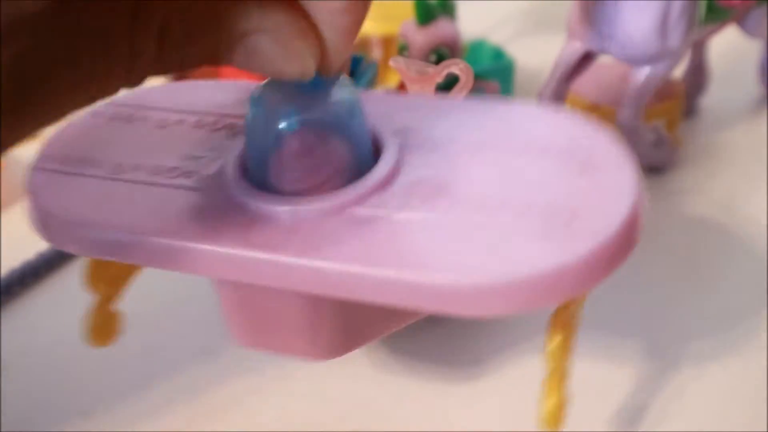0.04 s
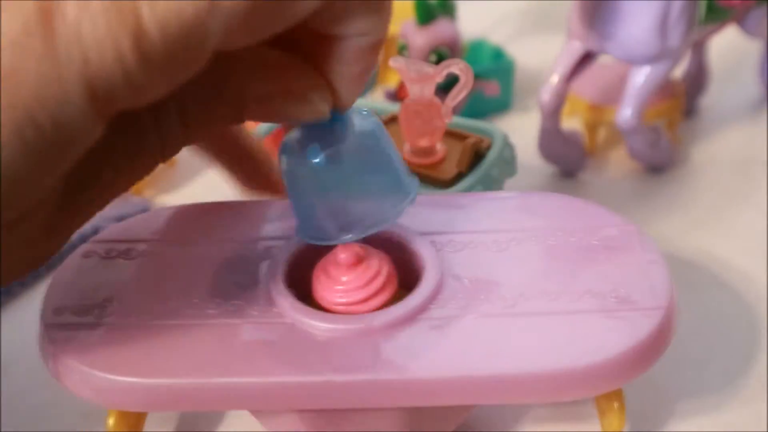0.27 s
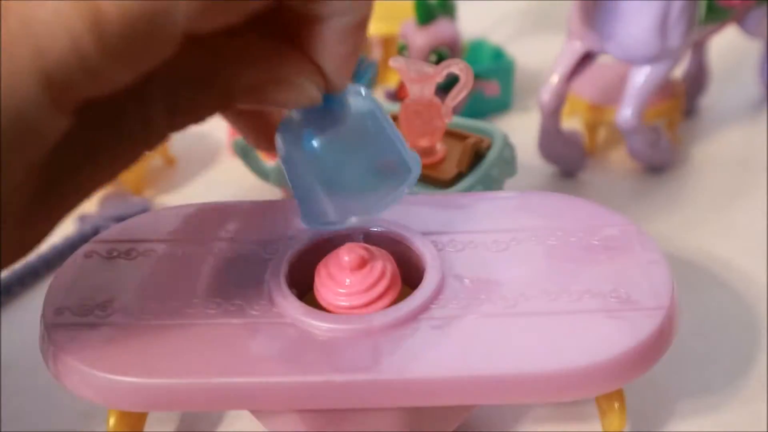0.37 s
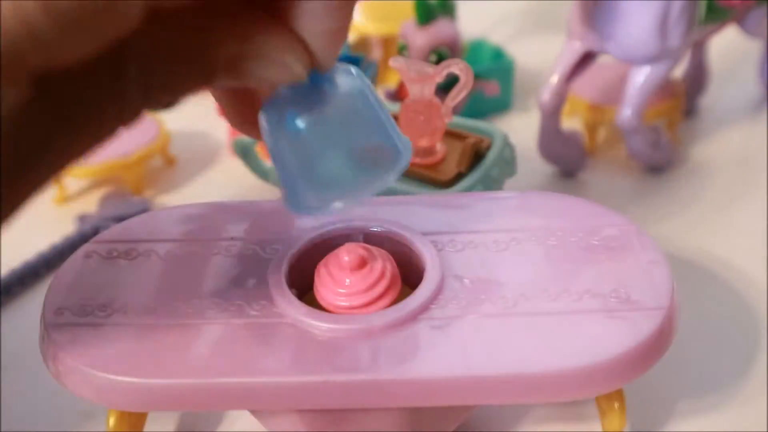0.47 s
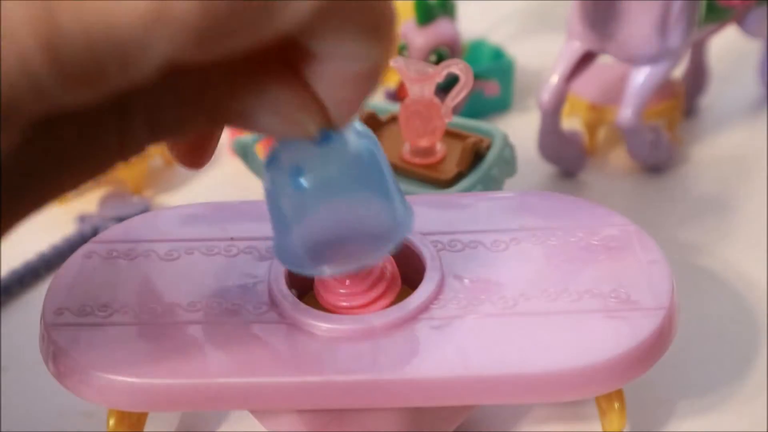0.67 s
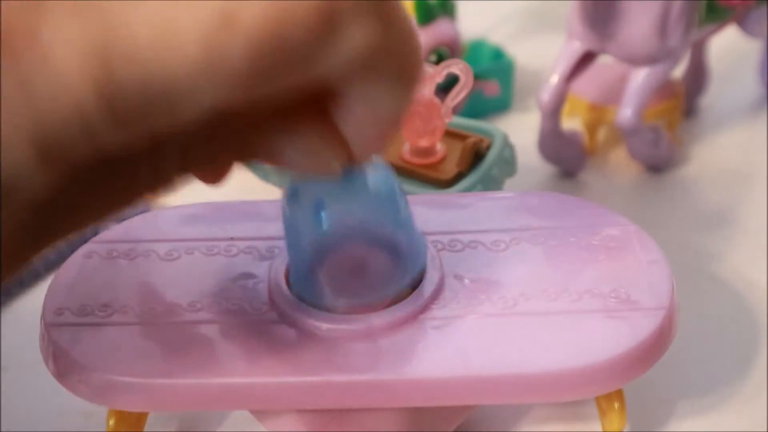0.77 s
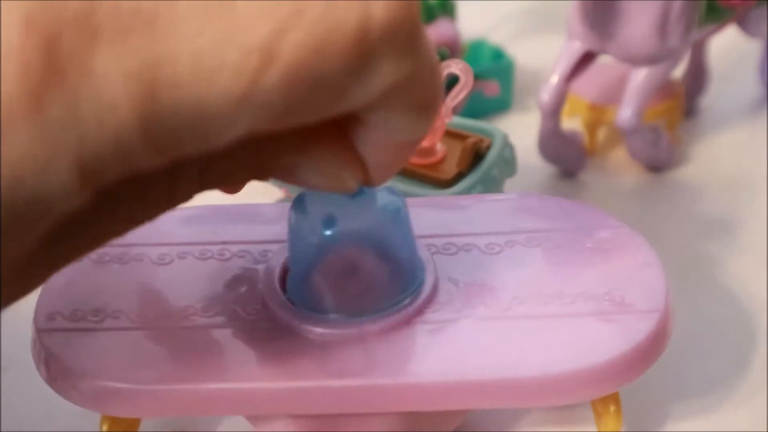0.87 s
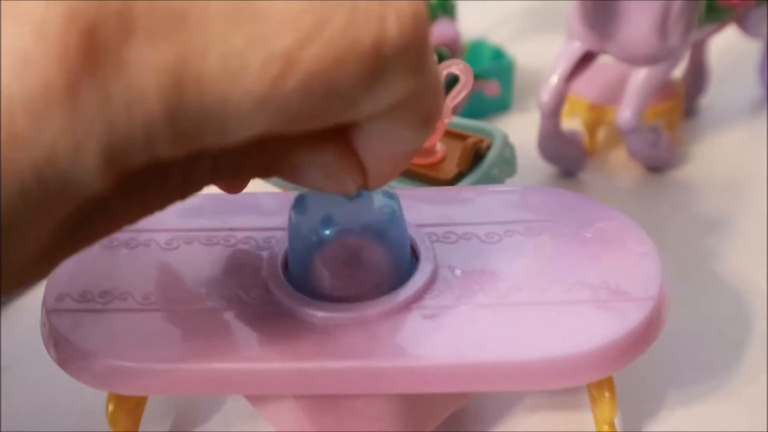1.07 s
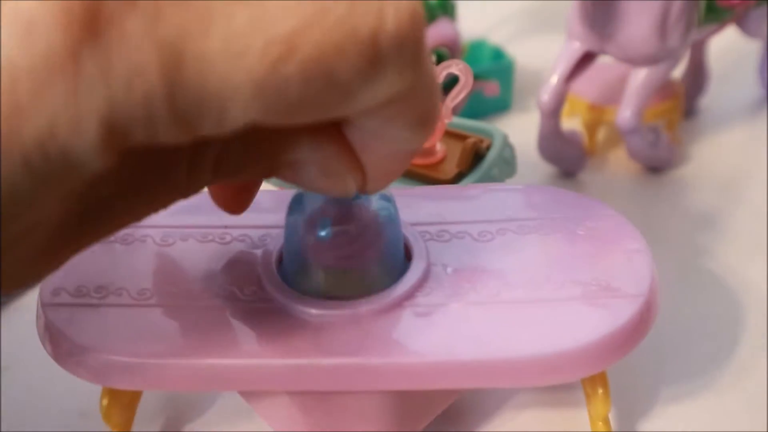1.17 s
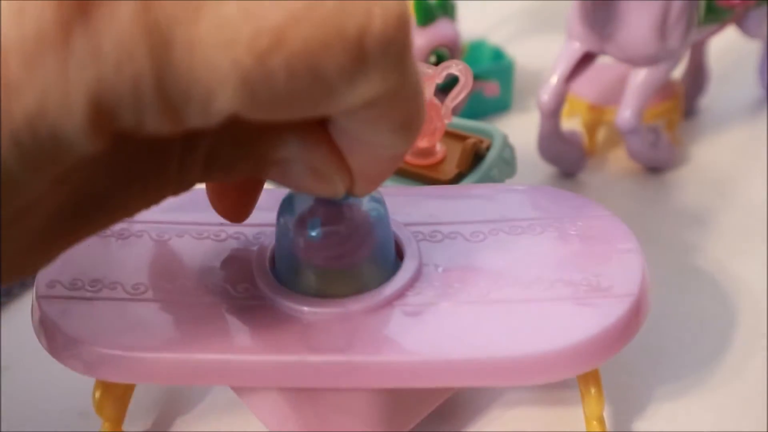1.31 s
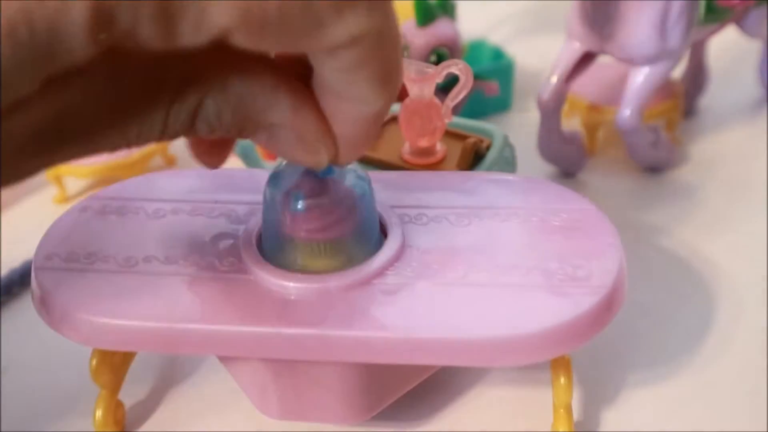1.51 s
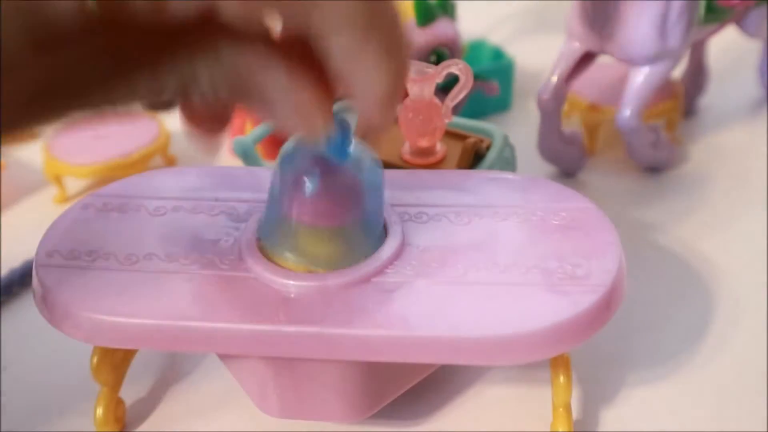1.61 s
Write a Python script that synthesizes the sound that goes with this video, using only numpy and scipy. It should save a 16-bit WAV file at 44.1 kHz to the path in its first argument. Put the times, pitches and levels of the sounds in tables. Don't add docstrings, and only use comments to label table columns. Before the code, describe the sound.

Close-up plastic toy handling: a bright burst of snaps first, a short pause, then light knocks and small clicks as the lid is seated, with faint finger rubbing, soft desk thumps and low room tone.

```python
import sys
import numpy as np
from scipy import signal
from scipy.io import wavfile

SR = 44100
rng = np.random.default_rng(int(sys.argv[2]) if len(sys.argv) > 2 else 0)


def level_to_linear(level):
    exponent = np.asarray(level, float) / 20
    return 10 ** exponent


def transcribe(u):
    v = np.clip(np.atleast_2d(u).T, -1, 1)
    q = np.round(v * 32767).astype(np.int16)
    wavfile.write(sys.argv[1], SR, q)


N = 72765
TOY_CUT_HZ = 220


def rms_one(x):
    return x / np.sqrt(np.mean(x ** 2) + 1e-20)


def at_hz(points, hz):
    pitches, values = np.transpose(points)
    return np.interp(np.log(hz), np.log(pitches), values)


def ring(clicks, hz, t60):
    shrink = level_to_linear(-60 / (max(t60, .003) * SR))
    turn = 2 * np.pi * hz / SR
    return signal.lfilter([0, np.sin(turn)], [1, -2 * shrink * np.cos(turn), shrink ** 2], clicks + 1e-18)


def cut(x, hz, kind, order=2):
    return signal.sosfilt(signal.butter(order, hz, kind, fs=SR, output="sos"), x)


def drift(rate):
    r = np.exp(-2 * np.pi * rate / SR)
    wander = signal.lfilter([1], [1, -2 * r, r * r], rng.standard_normal(2 * N))
    return rms_one(wander[N:])


def banded_noise(spectrum, likeness, patchy_db, rate):
    out = 0
    borders = 22 * 2 ** np.arange(0, 9.6, .5)
    white = rng.standard_normal((2, 2, N))
    for k, (low, high) in enumerate(zip(borders, borders[1:])):
        mid, side = cut(white[k % 2], [low, high], "band")
        hz = np.sqrt(low * high)
        alike = np.clip(at_hz(likeness, hz), -1, 1)
        stereo = np.sqrt(1 + alike) * mid + np.sqrt(1 - alike) * side * [[1], [-1]]
        out = out + level_to_linear(at_hz(spectrum, hz) + patchy_db * drift(rate)) * stereo
    return rms_one(out)


def struck(rows, modes):
    clicks = np.zeros(N)
    for s, db in rows:
        clicks[int(s * SR)] = level_to_linear(db)
    return sum(level_to_linear(db) * ring(clicks, hz, t60) for hz, db, t60 in modes)


def echo(x, t60, channels):
    t = np.arange(SR // 2) / SR
    tail = rng.standard_normal((channels, len(t))) * level_to_linear(-60 * t / t60)
    tail /= np.sqrt(np.sum(tail ** 2, axis=1, keepdims=True))
    return signal.fftconvolve(x[None], tail, axes=1)[:, :N]


def room_air():
    # (pitch [Hz], level [dB per Hz])
    air_colour = [(15, -32), (25, 0), (149, 0.5), (335, -10.5), (936, -7.5), (1020, -14.5), (2480, -16),
                  (9070, -34.5), (16000, -54)]
    # (pitch [Hz], likeness [-1 to 1])
    air_likeness = [(60, 1), (200, 0.95), (700, -0.77), (4000, 0.46), (15000, -.6)]
    return level_to_linear(-65) * banded_noise(air_colour, air_likeness, patchy_db=2.0, rate=5.8)


def whine():
    # (pitch [Hz], level [dB rms])
    tones = [(2536, -91), (2713, -87), (2918, -97), (3343, -91)]
    width_hz = 12
    return sum(level_to_linear(db) * rms_one(ring(rng.standard_normal(N), hz, 2.2 / width_hz)) for hz, db in tones)


def clock():
    # (time [s], peak level [dB])
    ticks = [(0.0538, -54), (0.0942, -50), (0.5294, -61.5), (0.5644, -61), (0.6943, -61.5), (0.7267, -55),
             (0.8315, -56), (0.8644, -61), (0.9951, -72.5), (1.2156, -57.5), (1.4282, -51.5)]
    hz = 2479
    return cut(struck(ticks, [(hz, 1.5, 0.015)]), [0.87 * hz, 1.25 * hz], "band")


def desk_hum():
    # (time [s], peak level [dB])
    pushes = [(.002, -58.5), (.19, -65), (.235, -37.5), (.295, -50.5), (.43, -53), (.885, -47.5),
              (.93, -49), (1.03, -49), (1.07, -53), (1.185, -56), (1.268, -41.5), (1.36, -51), (1.465, -43),
              (1.55, -47), (1.61, -51.5)]
    # (pitch [Hz], level [dB], ring time t60 [s])
    desk_modes = [(147.6, 1.5, 0.35), (173.5, -1, 0.16), (114, -4.5, 0.36), (213.5, 2, 0.24),
                  (285, -5.5, 0.057), (341.4, -16, .06)]
    push_s, push_hz = 0.015, 152
    t = np.arange(int(push_s * SR)) / SR
    push = np.sin(np.pi * t / push_s) * np.cos(2 * np.pi * push_hz * t)
    hum = np.convolve(struck(pushes, desk_modes), push / np.abs(push).sum())[:N]
    return level_to_linear(2.5) * cut(hum, 110.7, "high", order=4)


def palm_bumps():
    # (time [s], peak level [dB])
    bumps = [
        (.224, -47),
        (.305, -51),
        (1.07, -51),
        (1.192, -42.5),
        (1.47, -71),
    ]
    hz, t60_s = 62, .08
    return cut(struck(bumps, [(hz, 0, t60_s)]), 2 * hz, "low")


def rubbing():
    # (time [s], level [dB])
    pressure = [(0, -60.5), (.1, -62), (.17, -63), (0.377, -60.5), (0.461, -69), (.6, -80.5),
                (0.862, -75.5), (0.949, -59.5), (1.0, -63.5), (1.04, -61.5), (1.14, -64.5), (1.23, -59),
                (1.256, -52.5), (1.338, -53.5), (1.422, -62), (1.5, -57.5), (1.589, -57), (1.65, -58)]
    # (pitch [Hz], level [dB per Hz])
    rub_colour = [(180, -27), (300, 1), (444, -8), (1060, -3.5), (1520, -8), (2520, -9), (6510, -25),
                  (15000, -43)]
    # (pitch [Hz], likeness [-1 to 1])
    rub_likeness = [(300, 0.061), (2000, 0.48), (6000, 0.32), (15000, -.4)]
    loudness = level_to_linear(np.interp(np.arange(N) / SR, *np.transpose(pressure)))
    return loudness * banded_noise(rub_colour, rub_likeness, patchy_db=4.5, rate=34)


def squeaks():
    # (time [s], peak level [dB], first pitch [Hz], last pitch [Hz], length [s])
    chirps = [
        (0.39, -22, 2700, 2910, 0.0035),
        (.3912, -22, 3460, 4410, 0.0031),
        (1.6175, -42.5, 3240, 3620, 0.0041),
        (1.196, -33.5, 429, 565, .011),
    ]
    out = np.zeros(N)
    for s, db, from_hz, to_hz, length in chirps:
        share = np.arange(int(length * SR)) / (length * SR)
        turns = np.cumsum(from_hz + (to_hz - from_hz) * share) / SR
        swell = np.sin(np.pi * share ** 1.7)
        start = int(s * SR)
        out[start:start + len(share)] += level_to_linear(db) * swell * np.sin(2 * np.pi * turns)
    return out


def snaps():
    # (time [s], peak level [dB], pitch [Hz], ring time t60 [s])
    snap_rows = [(.2262, -11.5, 1535, 0.0083), (.2317, -7, 1608, 0.017), (.2318, -7.5, 2640, 0.02),
                 (.2385, -19, 2550, .008), (.2413, -19, 2810, 0.0029), (.2455, -23, 2720, .01),
                 (.2488, -19, 3200, .006), (.2536, -12.5, 3500, .005), (.2875, -20.5, 3900, 0.0044),
                 (.2916, -22, 2100, .006), (.3965, -21.5, 4800, 0.0027), (1.262, -24, 1120, .01),
                 (1.2695, -27.5, 1180, 0.017), (1.5538, -28, 3600, 0.0055), (1.5628, -26, 3600, 0.0047),
                 (1.5698, -30, 5640, 0.0034), (1.5705, -34, 3520, 0.0055), (1.577, -29, 3450, 0.0054),
                 (1.5205, -51, 800, .02), (1.5268, -42.5, 800, 0.045), (.2327, -29, 1880, 0.015),
                 (.2848, -22, 3670, 0.003), (.3, -22.5, 1960, .008), (1.2625, -19, 2380, .006),
                 (1.2695, -36, 2400, 0.0048), (1.279, -34, 2200, 0.0055), (1.2368, -44.5, 3000, 0.0054),
                 (1.532, -43, 725, .02), (0.3937, -31, 1750, 0.011), (.403, -35, 1800, 0.012),
                 (.9162, -29, 1920, 0.0081), (0.9224, -27.5, 1850, 0.011), (1.0553, -29, 2044, 0.019),
                 (1.197, -39, 1060, .018), (1.6192, -31, 3500, 0.0036), (1.4576, -38, 947, 0.026),
                 (1.459, -42, 2970, 0.0074), (.228, -23.5, 630, .05), (1.2605, -30, 4820, .003),
                 (0.204, -32, 1230, 0.018)]
    out = np.zeros(N)
    for s, db, hz, t60 in snap_rows:
        out += cut(struck([(s, db)], [(hz, 0, t60)]), [hz / 2.3, min(2 * hz, SR / 3)], "band")
    return out


def contacts(rows, strike=1, rise=1e-5):
    # (pitch [Hz], level [dB], ring time t60 [s])
    shell = [(552, -12.5, 0.1), (652, -17, 0.034), (800, -6, 0.01), (950, -5, 0.011), (1200, -3, 0.018),
             (1533, -6, 0.029), (1718, -4, 0.047), (2063, -3.5, 0.023), (2543, -0.5, 0.013),
             (2998, -2.5, 0.024), (3600, -3, 0.02), (4570, -7, 0.021), (5280, -6, 0.012), (6450, -15, .01)]
    own_db, own_cycles = 7.5, 13.8
    fall_above_db, fall_below_db = 3.5, 7.5
    held_share = 0.65
    out = np.zeros(N + SR)
    t = np.arange(SR // 8) / SR
    draws = rng.random((len(rows), 3, len(t)))
    spread = rng.standard_normal((len(rows), 2, len(shell)))
    for (s, db, hz, crack_db, decay), (when, size, sign), (own, detune) in zip(rows, draws, spread):
        sizes = level_to_linear(-16 - 0.85 * np.log(size + .01)) * np.sign(sign - .5)
        moments = (when < 4000 / SR) * np.exp(-t / max(decay, .001)) * (1 - np.exp(-(t / rise) ** 2))
        blow = strike * (t == 0)
        rattle = moments * sizes
        body = level_to_linear(own_db) * ring(rattle + blow, hz, own_cycles / hz)
        for k, (mode_hz, mode_db, t60) in enumerate(shell):
            mode_hz = mode_hz * (1 + 0.041 * detune[k])
            octaves = np.log2(mode_hz / hz)
            near_db = mode_db - max(fall_above_db * octaves, -fall_below_db * octaves) - 1.6 * own[k]
            mode_rattle = moments * np.roll(sizes, k + 1)
            mode = ring(blow, mode_hz, t60) + ring(mode_rattle, mode_hz, held_share * t60)
            body += (-1) ** k * level_to_linear(near_db) * mode
        body = cut(body, min(2.5 * hz, SR / 3), "low", order=3)
        crack = cut(cut(rattle + 0.66 * blow, 3890, "high"), 5050, "low")
        start = int(s * SR)
        out[start:start + len(t)] += level_to_linear(db - 9) * (body + level_to_linear(crack_db + 37) * crack)
    return out[:N]


def slips():
    # (time [s], level [dB], loudest pitch [Hz], crack level [dB], rattle decay [s])
    slip_rows = [(.188, -20.5, 1180, -25, 0.015), (.19, -9.5, 3600, -59, 0.0065),
                 (.238, -9.5, 2400, -11.5, 0.013), (0.52, -30, 3060, -11, 0.0018),
                 (1.022, -32, 1080, -33, 0.017), (1.243, -29, 2540, -28, 0.02),
                 (1.515, -30.5, 835, -33, 0.013), (1.2, -27.5, 3100, -23, 0.0035),
                 (.289, -24, 1000, -36, 0.027), (1.574, -21.5, 4540, -33, 0.0057),
                 (1.51, -37.5, 3140, -34, 0.013), (0.22, -18.5, 3600, -22, .006),
                 (1.264, -34, 3830, -6.5, 0.026)]
    return contacts(slip_rows, strike=0, rise=0.0014)


def cover_knocks():
    # (time [s], peak level [dB], loudest pitch [Hz], crack level [dB], rattle decay [s])
    pull = [(.198, -20, 3150, -9, 0.0017), (.2256, -12.5, 1530, -13.5, 0.0012),
            (.226, -8, 2830, -13, 0.015), (.227, -22.5, 613, -31, 0.045), (.2315, -11, 2820, -14, 0.0025),
            (.241, -22, 2800, -22, 0.033), (.248, -18, 2537, -18.5, .004),
            (.253, -18.5, 3460, -24.5, 0.016), (.2845, -13.5, 2010, -15, 0.0031),
            (.2875, -14, 4110, -13.5, 0.016), (.292, -20, 1876, -22.5, 0.017),
            (.375, -43.5, 3550, -14, 0.012), (.394, -31.5, 2697, -12.5, 0.0068),
            (.3935, -30, 4220, -7.5, 0.0048), (.397, -33.5, 1060, -19.5, 0.017)]
    seat = [(.8805, -34.5, 2220, -26, 0.0081), (.882, -34.5, 1200, -35, 0.031),
            (.887, -36.5, 4910, -29.5, 0.0066), (.9158, -27, 1856, -31.5, 0.00082),
            (.922, -28, 1830, -36, 0.01), (1.017, -47, 1860, -35, 0.0054), (1.035, -46, 3400, -14, 0.0028),
            (1.055, -26, 2060, -27.5, 0.0075), (1.06, -36, 1200, -41, 0.024),
            (1.089, -38.5, 395, -28, 0.00081), (1.184, -32, 400, -39.5, 0.0023),
            (1.189, -34.5, 1050, -39, 0.0092), (1.1972, -40, 520, -46.5, 0.0037),
            (1.199, -44, 1050, -50, 0.001)]
    press = [(1.236, -35.5, 2980, -23, 0.0055), (1.251, -30, 2987, -16.5, 0.018),
             (1.258, -20, 2890, -34, 0.014), (1.261, -21, 1210, -4.5, 0.0023),
             (1.268, -29, 1076, -14, 0.028), (1.329, -43, 2560, -12, 0.0026),
             (1.458, -31.5, 950, -43, 0.019), (1.458, -37.5, 2850, -27, 0.002),
             (1.478, -31.5, 904, -35, 0.022), (1.5525, -27, 1134, -44, 0.011),
             (1.553, -34, 3600, -27, 0.027), (1.562, -26.5, 3420, -26, 0.0022),
             (1.563, -28.5, 920, -21, 0.019), (1.57, -33, 4250, -18, 0.0026)]
    return contacts(pull) + contacts(seat) + contacts(press)


def scene():
    toy = cut(cover_knocks() + slips() + squeaks() + snaps(), TOY_CUT_HZ, "high")
    toy = toy + level_to_linear(-8) * echo(toy, 0.092, channels=1)[0]
    desk = desk_hum() + palm_bumps()
    near = toy + clock()
    scatter = echo(near, 0.027, channels=1)[0] * drift(60)
    side = level_to_linear(-2) * cut(scatter + 0.3 * near, 4100, "high", order=4) + level_to_linear(-18.5) * scatter
    tail = level_to_linear(-23.5) * cut(echo(near, 0.3, channels=2), [2 * TOY_CUT_HZ, 6100], "band", order=1)
    direct = (near + desk + side * [[1], [-1]]) * level_to_linear([[0.12], [-0.12]])
    return direct + tail + rubbing() + room_air() + whine()


def band_limit(x):
    return signal.sosfilt(signal.butter(12, 16620, fs=SR, output="sos"), x)


def record(dry):
    mix = signal.sosfilt(signal.ellip(10, .5, 60, 15900, fs=SR, output="sos"), dry)
    return band_limit(mix)


dry = scene()
out = record(dry)
transcribe(out)
```